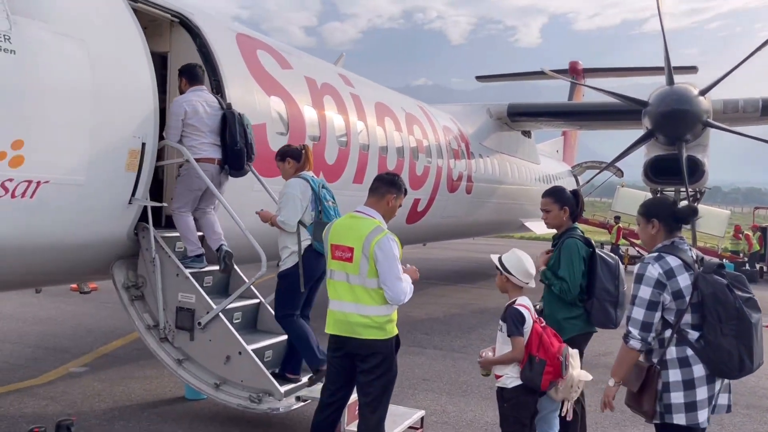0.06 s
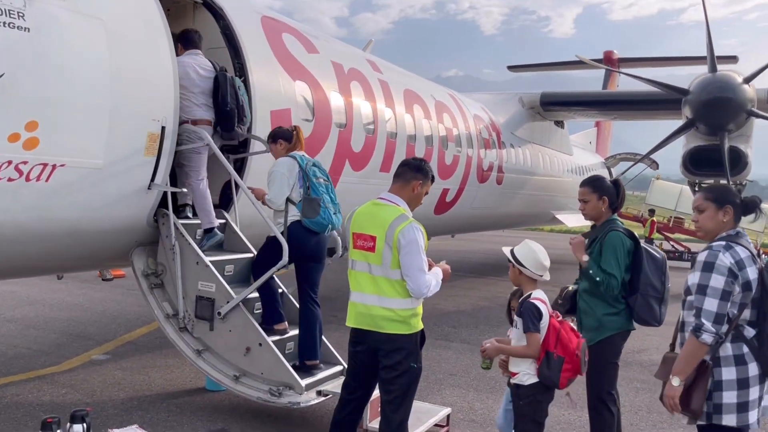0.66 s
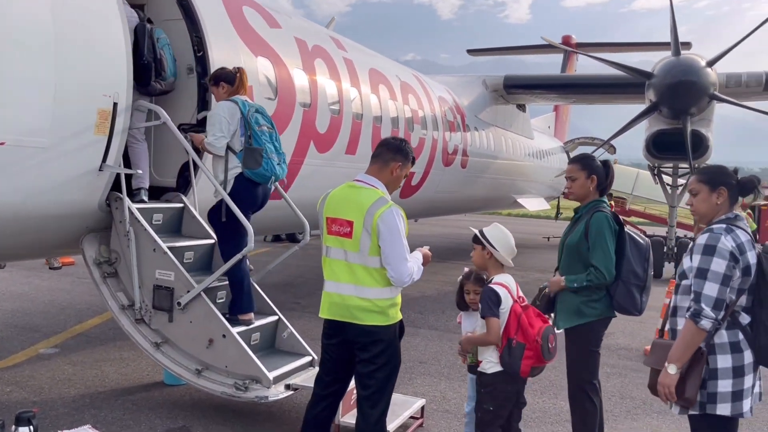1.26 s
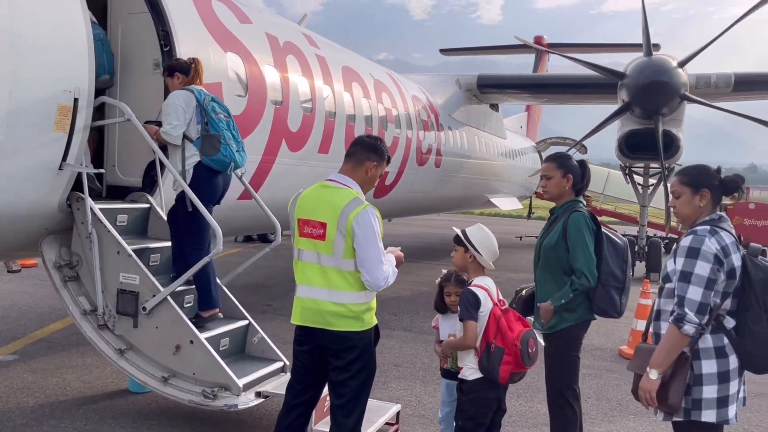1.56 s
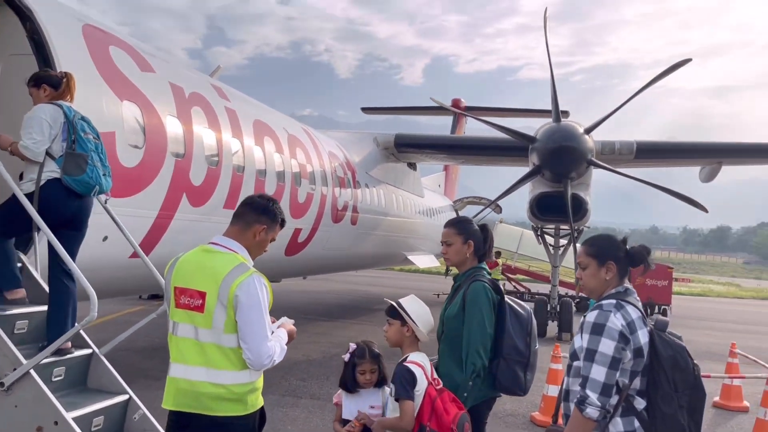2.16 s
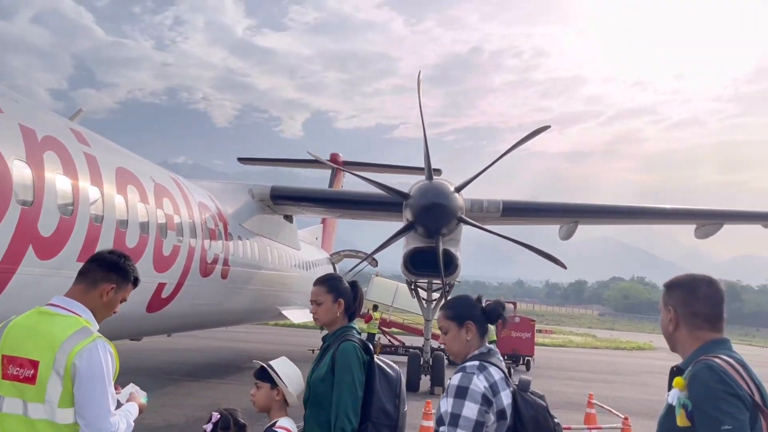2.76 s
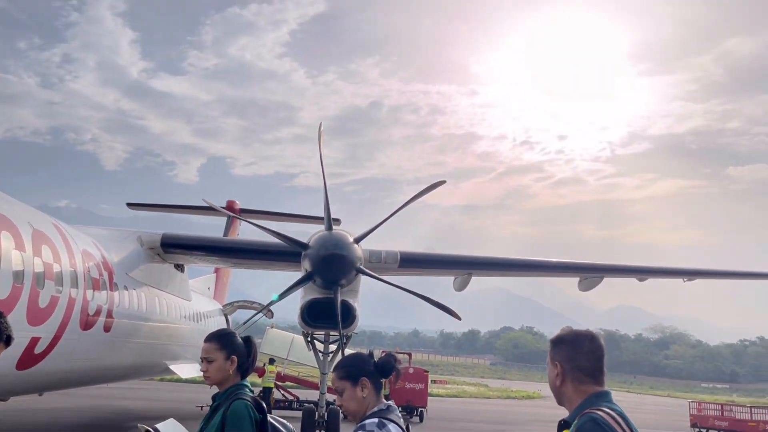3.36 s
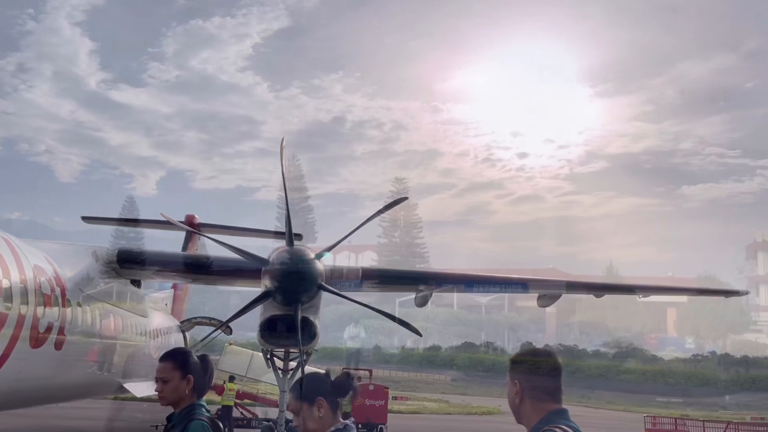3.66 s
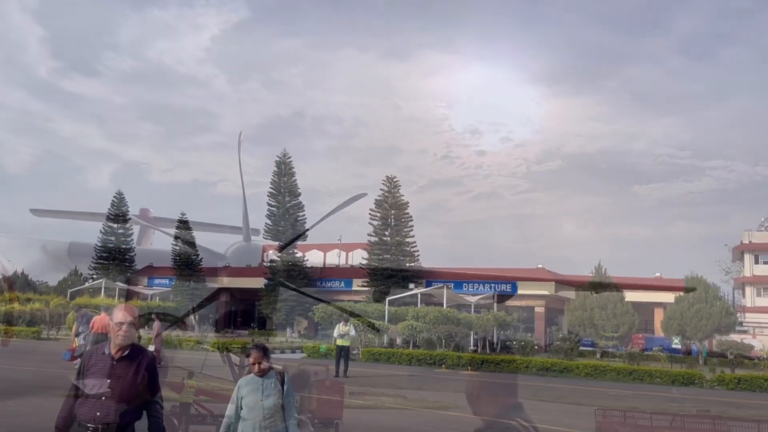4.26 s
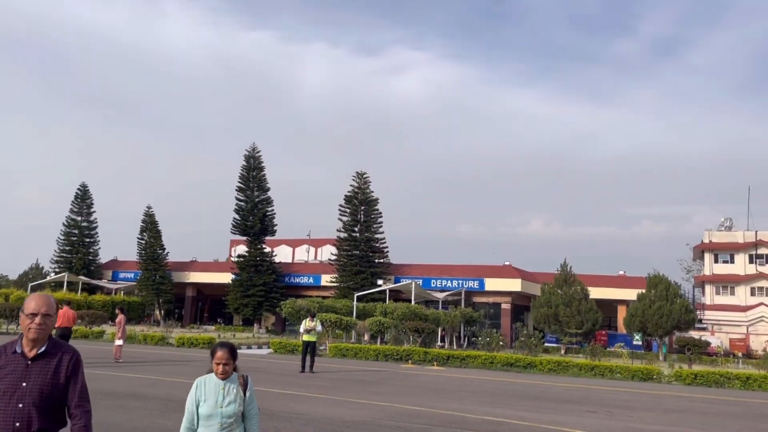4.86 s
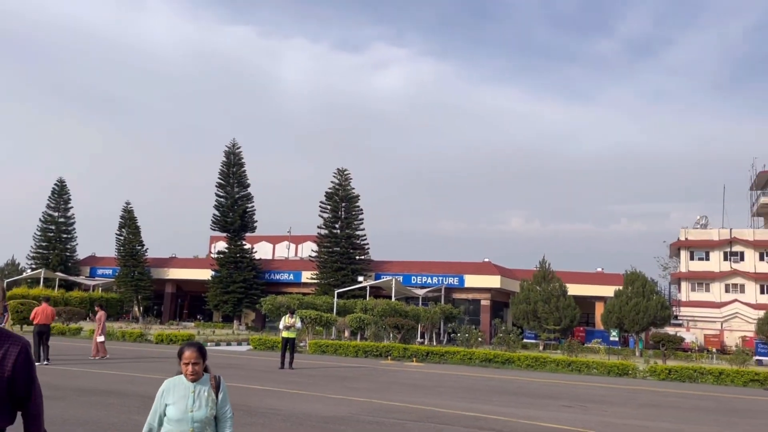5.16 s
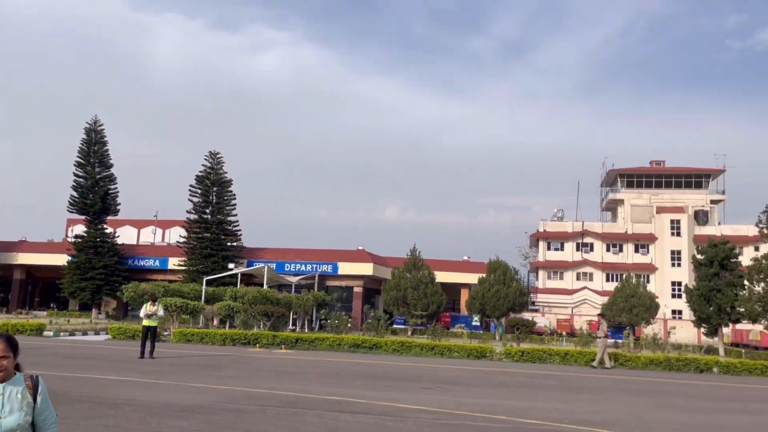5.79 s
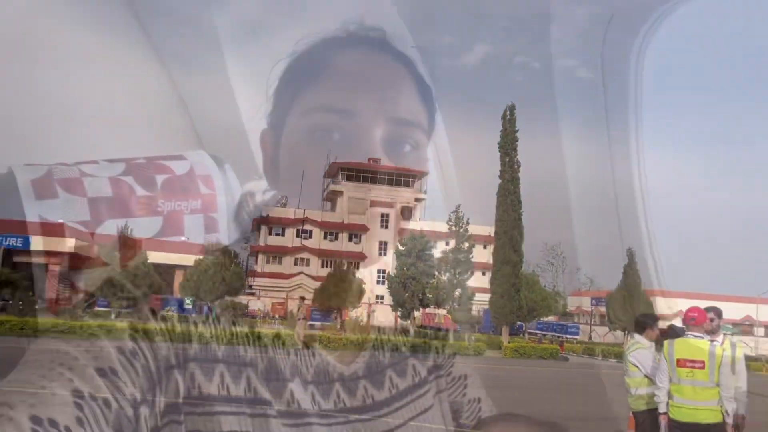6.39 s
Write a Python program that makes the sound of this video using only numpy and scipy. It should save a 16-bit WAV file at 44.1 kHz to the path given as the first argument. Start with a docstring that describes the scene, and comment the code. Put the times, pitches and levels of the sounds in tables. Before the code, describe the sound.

Out on an airport apron, the low throb of a diesel generator sits under the continuous rush and whistling whine of an idling turboprop engine. The stereo sound shifts abruptly twice: first heard from the boarding door, it turns fuller and louder near the wing, then softer and less hissy as the microphone faces away from the aircraft. The engines run throughout.

```python
"""A steady roar with a high whine and whistles is heard first: a turboprop's gas turbine idling on an
airport apron. Turbulent exhaust and intake flow give the broadband noise, the spinning shaft a harmonic
whine, and air at the intake the whistles. Beneath them drones a diesel ground power unit, its tones set
by the firing of its cylinders. The listener, a pair of microphones, takes three places in turn, changing
abruptly: at the boarding door, closer to the wing, and turned away towards the terminal."""
import sys
import numpy as np
from scipy import signal
from scipy.fft import rfft, irfft, next_fast_len
from scipy.io import wavfile
from scipy.ndimage import uniform_filter1d, map_coordinates

SR = 44100
rng = np.random.default_rng(int(sys.argv[2]) if len(sys.argv) > 2 else 0)


def put_to_file(sound):
    """Save the sound as 16-bit audio at rate SR, in the file named by the first command-line argument."""
    columns = np.atleast_2d(sound).T  # one column per channel
    safe = np.clip(columns, -1, 1)
    whole_steps = np.round(safe * 32767)
    wavfile.write(sys.argv[1], SR, whole_steps.astype(np.int16))


N = 292383

DOOR, WING, TERMINAL = range(3)
# the listener's stay at each place: (start [s], end [s])
STAYS = [(-1, 3.395), (3.395, 4.9), (4.9, 8)]
# how the sound meets the two microphones at each place:
# (frequency [Hz], coherence [0-1], left over right [dB], left phase lead [rad])
MICS_DOOR = [(130, 1, -1, 0.21), (300, 0.97, -2, -0.16), (553, 0.78, -1, -0.086), (970, 0.83, 1, -0.53),
             (1480, 0.16, 1, -1.4), (1800, 0.85, 0.7, 0.052), (2430, 0.98, 0, 0.9), (3720, 0.84, 1.5, 1),
             (5530, 0.16, 2, -1.1), (6870, 1, 1.5, -1.25)]
MICS_WING = [(130, 0.94, -1.5, -0.19), (302, 0.91, -3, 0.29), (547, 0.72, 1, 1.14), (945, 0.84, 0.5, 1),
             (1450, 0.39, -3, 1.9), (1750, 0.52, 0, -0.072), (2380, 0.21, 3, 0.4), (3600, 0.08, 1, -1.2),
             (5240, 0.42, 3.5, -0.27), (6850, 0.34, 0, -1.14)]
MICS_TERMINAL = [(130, 1, -2.5, -0.85), (300, 0.94, -2, -0.4), (455, 0.14, -4.5, -1.3),
                 (547, 0.76, -1, 2.5), (710, 0.2, -7.5, 1), (1000, 0.57, -8, 1), (1480, 0.56, -6.5, -0.35),
                 (1850, 0.35, 6, 0), (2370, 0.17, -2, 1.6), (3500, 0.12, 1.5, -2.5), (5500, 0.04, 4.5, 1),
                 (7730, 0.11, -5.5, 1.5)]
# the microphones' stereo colouring of the high hiss, the same at every place; columns as above
MIC_TREBLE = [(7750, .85, 0, -2.6), (8200, .97, 0, -3.1), (9100, .96, 0, -3.3), (9600, .75, 0, -3.8),
              (10000, .5, 0, -4.7), (10600, .85, 0, -5.95), (11800, .98, 0, -6.28), (13000, .78, 0, -6.7),
              (14200, .7, 0, -8), (14800, .93, 0, -9.3)]
# spectra of combustion rumble, exhaust roar, intake rush and compressor hiss:
# (frequency [Hz], relative spectral density [dB])
RUMBLE = [(15, -45), (28, -26), (38, -10), (48, -2.5), (70, -1.5), (100, -1.5), (135, -5.5), (170, -21),
          (260, -35)]
ROAR_DOOR = [(90, -16), (170, 2), (250, -2), (330, -5.5), (420, -4.5), (520, -9), (620, -5), (760, -8),
             (900, -5), (1025, -10.5), (1110, -10.5), (1250, -12), (1340, -13.5), (1480, -14), (1620, -11),
             (2000, -25)]
ROAR_WING = [(90, -16), (170, 1.5), (250, -2), (330, -2.5), (420, -4.5), (520, -3.5), (590, -5.5),
             (780, -2), (1080, -4.5), (1250, -9), (1400, -8), (1620, -10), (2000, -30)]
ROAR_TERMINAL = [(90, -40), (170, 0.8), (250, -6), (330, -5), (420, -5), (520, -7), (590, -8.5), (660, -4),
                 (780, -2.5), (1080, -2), (1250, -5.5), (1400, -6), (1630, -6), (1730, -18), (2000, -30)]
RUSH_DOOR = [(1450, -26), (1780, 3), (2000, 0), (2300, -0.5), (2800, -1), (3500, -4), (4300, -8),
             (5300, -8), (5900, -5), (6600, -4), (7400, -4), (8800, -63)]
RUSH_WING = [(1450, -2), (1780, 4.5), (2000, -1.5), (2300, 0), (2800, -1.5), (3500, -3.5), (4300, -5),
             (5300, -6), (5900, -6), (6600, -2.5), (7400, -5), (8800, -53)]
RUSH_TERMINAL = [(1450, -37), (1780, 3.5), (2000, 0.5), (2300, 0.5), (2800, -2.5), (3500, -3.5),
                 (4300, -5.5), (5300, -4), (5900, -6.5), (6600, -3), (7400, -4.5), (8800, -23)]
HISS = [(6900, -25), (7700, -2), (8300, -1), (9000, -3.5), (10200, -5.6), (11600, -5.6), (12900, -1),
        (13800, 1), (14500, -0.5), (15000, -4), (15600, -7), (16500, -20)]
# harmonic series: (harmonic number, level at door [dB], at wing [dB], towards terminal [dB])
DIESEL_HARMONICS = [(2, -66, -50, -50), (3, -36, -37, -34), (4, -31, -29, -33.5), (5, -38.5, -36, -42),
                    (6, -44, -42.5, -45), (7, -44.5, -45, -53), (8, -38, -41.5, -47.5),
                    (10, -50, -48.5, -64), (15, -52.5, -52, -58), (19, -49, -63, -72)]  # of the engine cycle; the fourth is the firing rate
SHAFT_OVERTONES = [(2, -61, -53.5, -53.5), (3, -60, -55, -58), (4, -53.5, -54, -57), (5, -64, -68, -56),
                   (11, -59, -65, -72), (12, -52, -47.5, -60), (13, -51, -52, -68)]
# intake whistles: (frequency [Hz], width [Hz], level at door [dB], at wing [dB], towards terminal [dB])
WHISTLES = [(6208, 60, -45.5, -42, -46.5), (6962, 55, -45, -42.3, -50.5), (7700, 80, -45, -42.7, -51.5),
            (8430, 170, -48.5, -48, -59)]
# brief noise bands: (peak time [s], length [s], centre [Hz], width of each filter stage [Hz], level [dB])
SWISHES = [(.4, 0.35, 12600, 3600, -36), (.98, 0.32, 12800, 2000, -37.5)]
PASSING_BANDS = [(0.143, 0.46, 1574, 110, -39.5), (.2, 0.97, 394, 150, -42.5), (1.1, 2.4, 1320, 400, -43),
                 (1.12, .45, 4279, 24, -54), (.3, 0.84, 2260, 50, -43.5), (0.59, 1.6, 1115, 90, -41),
                 (1.353, 2.06, 2260, 524, -39.5), (2.067, 0.3, 1860, 240, -41), (3.13, 0.54, 1775, 36, -47),
                 (3.95, .3, 1590, 120, -46), (4.18, 0.18, 1150, 110, -33.5), (5.23, 0.29, 1126, 130, -35.5),
                 (5.7, 0.6, 1060, 240, -35.5), (6.003, 0.11, 360, 200, -37.5), (6, 0.45, 4279, 24, -52),
                 (6.25, 1.1, 1584, 170, -43), (6.25, 0.75, 523, 50, -45), (6.3, 0.99, 199, 70, -41.5),
                 (6.42, 0.7, 338, 170, -41.5), (6.52, 0.36, 5350, 1100, -43.5)]
# smooth rises and dips: (peak time [s], length [s], level change [dB])
RUMBLE_SURGES = [(2.04, 0.088, 4.5), (2.42, 0.54, -3.5), (3.46, 0.19, 3), (3.8, 0.24, -4), (4.0, 0.33, 1.5),
                 (4.6, 0.4, 3), (5.55, 0.15, -6)]
RUMBLE_LULLS = [(.3, 1.5, -2.5), (2.7, .5, -1.5), (5.9, 1, -1)]  # these leave the diesel's throb bare
FAN_SWELLS = [(.3, 0.67, 4), (2.15, 0.47, 5.5), (4.6, 0.57, 6)]
SHAFT_SWELLS = [(3.46, .22, 1.5), (3.95, 0.36, -1.5), (4.5, .55, 3)]
# the turbine comes into the open (+) or is screened (-); each layer takes its own share of the change:
# (peak time [s], length [s], full level change [dB])
OPENINGS = [(.35, 0.61, 3.5), (1.45, 1.1, -9.5), (4.5, 0.45, 5), (5.94, 0.3, 5), (6.53, 0.5, 5.5)]

CYCLE_HZ, FAST_CYCLE_HZ = 17.083, 18.0  # diesel engine cycle
SHAFT_HZ = 1069.7
WHISTLE_PURITY = .22  # share of a whistle's power in its held tone
FACING_S, LEAVING_S = 2.33, 5.94  # the listener faces the engine; later turns further away
ECHO_MS, CLOSER_MS = 1.817, 0.19  # fuselage echo: its delay, and the most that this shortens
TREBLE_HZ, TOP_HZ = 3240, 15720  # treble shelf corner; upper band limit


def amp(db):
    """Amplitude ratio of a level in decibels."""
    return 10 ** (np.asarray(db) / 20)


def unit(x):
    """Normalisation to rms 1."""
    return x / np.sqrt(np.mean(x ** 2) + 1e-20)


def clock():
    """Sample times in seconds."""
    return np.arange(N) / SR


def grid():
    """Fourier frequencies of the zero-padded signal."""
    return np.fft.rfftfreq(2 * next_fast_len(N // 2 + 4096), 1 / SR)


def along(rows, hz):
    """Interpolation of a table's columns on a logarithmic frequency axis."""
    knots_hz, *columns = np.transpose(rows)
    return [np.interp(np.log(hz + 1), np.log(knots_hz + 1), column) for column in columns]


def wobble(rate):
    """Slow random modulation: a spline through `rate` Gaussian knots a second."""
    return map_coordinates(rng.standard_normal(int(N * rate / SR) + 4), [np.arange(N) * rate / SR])


def swell(peak_s, length, order=2):
    """Generalised Gaussian envelope; a higher order holds the top longer."""
    return np.exp(-abs(2 * (clock() - peak_s) / length) ** order)


def swells(rows):
    """Successive gains add in decibels: the sum of a table's rises and dips."""
    return sum(db * swell(peak_s, length) for peak_s, length, db in rows)


def leaving():
    """Directional loss as the listener turns from the aircraft, as a level change in decibels."""
    return -6 * np.maximum(clock() - LEAVING_S, 0)


def colour(points):
    """Spectral envelope as a gain, zero beyond the table's ends."""
    hz = grid()
    return amp(along(points, hz)[0]) * (hz > points[0][0]) * (hz < points[-1][0])


def resonance(centre_hz, width_hz):
    """Response of a damped second-order resonator, its far skirts rolled off."""
    hz = grid()
    peak = hz * width_hz / (centre_hz ** 2 - hz ** 2 + 1j * hz * width_hz)
    return peak / (1 + ((hz - centre_hz) / (5 * width_hz)) ** 4)


def treble_shelf(x, lift_db):
    """Shelving filter: the treble is raised or lowered by a level that may vary in time."""
    hz = grid()
    highpass = 1 - 1 / (1 + (hz / TREBLE_HZ) ** 8)
    treble = irfft(rfft(x, 2 * (len(hz) - 1)) * highpass)[:, :N]
    return x + (amp(lift_db) - 1) * treble


def panned(x, balance_db):
    """Amplitude panning: the left channel exceeds the right by balance_db."""
    return amp(balance_db * np.array([[.5], [-.5]])) * x


def rotation(hz, drift, rate):
    """Phase is the integral of frequency, which here wanders by about the fraction `drift`."""
    return 2 * np.pi * np.cumsum(hz * (1 + drift * wobble(rate))) / SR


def turbulence(gain, mics):
    """Partially coherent noise of rms 1: direct sound is common to both microphones, diffuse is not."""
    hz = grid()
    coherence, balance_db, lead = along(mics + MIC_TREBLE, hz)
    mix = np.arccos(np.clip(coherence, 0, .995)) / 2
    a, b = rng.standard_normal((2, len(hz))) + 1j * rng.standard_normal((2, len(hz)))
    common, opposed = np.cos(mix) * a, np.sin(mix) * b
    pair = np.array([common + opposed, common - opposed])
    pan = np.arctan(amp(balance_db))
    mic_gains = [np.sin(pan) * np.exp(1j * lead), np.cos(pan)]
    return unit(irfft(pair * gain * mic_gains)[:, :N])


def tone(angle, hz, mics, scatter, rate):
    """Scintillation: moving hot air scatters a tone's amplitude and phase at each microphone; rms 1."""
    _, balance_db, lead = along(mics + MIC_TREBLE, hz)
    coarse = np.linspace(0, N * rate / SR, 2000)
    fine = np.linspace(0, coarse[-1], N)
    knots = rng.standard_normal((4, int(coarse[-1]) + 4))
    smooth = np.array([map_coordinates(row, [coarse]) for row in knots])
    paths = 1 + scatter * (smooth[:2] + 1j * smooth[2:])
    paths *= [[amp(balance_db) * np.exp(1j * lead)], [1]]
    carrier = np.exp(1j * angle)
    return unit(np.array([(np.interp(fine, coarse, path) * carrier).real for path in paths]))


def fuselage_echo(x, strength):
    """Comb filtering by a dull reflection; the peaks slide as its path shortens and grows again."""
    delay_ms = ECHO_MS - CLOSER_MS * swell(peak_s=1.7, length=0.69)
    delayed = np.arange(N) - delay_ms * SR / 1000
    echo = np.array([map_coordinates(side, [delayed]) for side in treble_shelf(x, lift_db=-15)])
    return unit(x + strength * echo)


def shimmer(x, depth_db):
    """Interference of weak echoes off aircraft and concrete, as random drifting peaks and dips."""
    spectra = signal.stft(x, nperseg=2048)[2]
    field = rng.standard_normal(spectra.shape[1:])
    for _ in range(2):
        field = uniform_filter1d(field, size=2, axis=0)  # across frequency
        field = uniform_filter1d(field, size=14, axis=1)  # across time
    return signal.istft(spectra * amp(depth_db * unit(field)), nperseg=2048)[1][:, :N]


def ground_power(mics, place, cycle_hz, fan_db, rumble_db):
    """Uneven firing gives harmonics of the diesel's cycle; its fan hums two octaves above the firing."""
    angle = rotation(cycle_hz, drift=.0007, rate=1.5)
    drone = sum(amp(db[place]) * np.sqrt(2) * np.sin(k * angle + rng.uniform(0, 2 * np.pi))
                for k, *db in DIESEL_HARMONICS)
    fan = np.sqrt(2) * np.sin(16 * angle)
    rumble = turbulence(colour(RUMBLE), mics)
    surge_db = swells(RUMBLE_SURGES)
    tones = amp(0.57 * surge_db) * drone + amp(fan_db + swells(FAN_SWELLS)) * fan
    return panned(tones, balance_db=-0.8) + amp(rumble_db + surge_db + swells(RUMBLE_LULLS)) * rumble


def swishes(mics):
    """Two airy swells of band-pass noise, perhaps the friction of nylon bags on clothes."""
    return sum(amp(db) * swell(peak_s, length) * turbulence(resonance(hz, width) ** 2, mics)
               for peak_s, length, hz, width, db in SWISHES)


def hoot(peak_s, length, hz, db):
    """A short, nearly pure tone rises out of the roar; a level difference places it to the left."""
    angle = rotation(hz, drift=.007, rate=25)
    envelope = amp(db + 1.5 * wobble(24)) * swell(peak_s, length, order=6)
    return panned(envelope * np.sqrt(2) * np.sin(angle), balance_db=8)


def passing_bands(mics, place):
    """Band-pass noise: brief swells of low roar, ringing midrange, a thin 4.3 kHz whine and hiss."""
    start, end = STAYS[place]
    return sum(amp(db) * swell(peak_s, length, order=4) * turbulence(resonance(hz, width) ** 2, mics)
               for peak_s, length, hz, width, db in PASSING_BANDS if start < peak_s < end)


def airflow(roar, rush, mics, roar_db, rush_db, hiss_db, beaming, echo=0):
    """Turbulence in exhaust, intake and compressor radiates broadband noise; the intake's treble beams."""
    breeze = wobble(12)  # makes rush and hiss flutter together
    intake = turbulence(colour(rush), mics)
    if echo:
        intake = fuselage_echo(intake, echo)
    intake = treble_shelf(intake, beaming * swells(OPENINGS))
    exhaust = amp(roar_db + leaving() + 0.34 * wobble(5.91)) * turbulence(colour(roar), mics)
    intake *= amp(rush_db + 0.77 * leaving() + 0.44 * breeze + 0.77 * wobble(22.02))
    compressor = amp(hiss_db + 0.2 * breeze + 0.56 * wobble(20.97)) * turbulence(colour(HISS), mics)
    return shimmer(exhaust + intake + compressor, depth_db=1.2)


def whistles(mics, place, beaming, flutter_db):
    """Flow tones at the intake, each in a narrow noise band; their pitches waver together with the flow."""
    angle_per_hz = rotation(1, drift=.003, rate=45)
    out = 0
    for hz, width, *db in WHISTLES:
        core = np.sqrt(WHISTLE_PURITY) * tone(hz * angle_per_hz, hz, mics, scatter=.3, rate=40)
        skirt = np.sqrt(1 - WHISTLE_PURITY) * turbulence(resonance(hz, width), mics)
        out = out + amp(db[place] + flutter_db * wobble(17)) * (core + skirt)
    return amp(beaming * swells(OPENINGS)) * out


def whine(mics, place, shaft_db, pipe_db):
    """Periodic rotation gives a shaft tone and its harmonics, over the exhaust pipe's hollow resonance."""
    approach_db = 6 * np.minimum(clock() - FACING_S, 0)
    angle = rotation(SHAFT_HZ, drift=0.0004, rate=20)
    shaft_gain = amp(shaft_db + 1.8 * approach_db + swells(SHAFT_SWELLS) + leaving())
    shaft = shaft_gain * tone(angle, SHAFT_HZ, mics, scatter=0.08, rate=8)
    overtones = sum(amp(db[place]) * tone(k * angle, k * SHAFT_HZ, mics, scatter=0.75, rate=14)
                    for k, *db in SHAFT_OVERTONES)
    pipe = amp(pipe_db + approach_db) * turbulence(resonance(centre_hz=521.0, width_hz=35), mics)
    return shaft + amp(0.21 * swells(OPENINGS)) * overtones + pipe


def at_door():
    """Reflection: beside the boarding stairs the fuselage returns an echo of the intake."""
    mics = MICS_DOOR
    diesel = ground_power(mics, DOOR, CYCLE_HZ, fan_db=-40.5, rumble_db=-28)
    air = airflow(ROAR_DOOR, RUSH_DOOR, mics, roar_db=-27.5, rush_db=-35, hiss_db=-37,
                  beaming=0.1, echo=0.28)
    turbine = whistles(mics, DOOR, beaming=0.71, flutter_db=2.2)
    turbine += whine(mics, DOOR, shaft_db=-40.5, pipe_db=-36)
    return diesel + air + turbine + passing_bands(mics, DOOR) + swishes(mics)


def at_wing():
    """Less spreading loss: nearer the turbine, its roar, rush and whistles are louder."""
    mics = MICS_WING
    diesel = ground_power(mics, WING, CYCLE_HZ, fan_db=-41, rumble_db=-27)
    air = airflow(ROAR_WING, RUSH_WING, mics, roar_db=-24.5, rush_db=-32, hiss_db=-37, beaming=.05)
    turbine = whistles(mics, WING, beaming=0.71, flutter_db=1.5)
    turbine += whine(mics, WING, shaft_db=-38, pipe_db=-37.5)
    bands = passing_bands(mics, WING)
    return diesel + air + turbine + bands + hoot(peak_s=4.05, length=0.29, hz=763, db=-34)


def towards_terminal():
    """Acoustic shadow: with the aircraft behind, hiss and fan are weaker. The diesel runs a bit faster."""
    mics = MICS_TERMINAL
    diesel = ground_power(mics, TERMINAL, FAST_CYCLE_HZ, fan_db=-55, rumble_db=-29.5)
    air = airflow(ROAR_TERMINAL, RUSH_TERMINAL, mics, roar_db=-28.5, rush_db=-37.5, hiss_db=-46.5,
                  beaming=0.87)
    turbine = whistles(mics, TERMINAL, beaming=0.8, flutter_db=2)
    turbine += whine(mics, TERMINAL, shaft_db=-47, pipe_db=-49.5)
    return diesel + air + turbine + passing_bands(mics, TERMINAL)


def scene():
    """The three places follow one another, joined by equal-power crossfades of 5 ms."""
    t = clock()
    out = 0
    for (start, end), sound in zip(STAYS, [at_door, at_wing, towards_terminal]):
        inside_s = np.minimum(t - start, end - t)
        gate = np.sqrt(np.clip(inside_s / .005 + .5, 0, 1))
        out = out + gate * sound()
    return out


def record(dry):
    """Band limiting: an ideal low-pass filter passes nothing above TOP_HZ."""
    hz = grid()
    return irfft(rfft(dry, 2 * (len(hz) - 1)) * (hz < TOP_HZ))[:, :N]


dry = scene()
out = record(dry)
put_to_file(out)
```